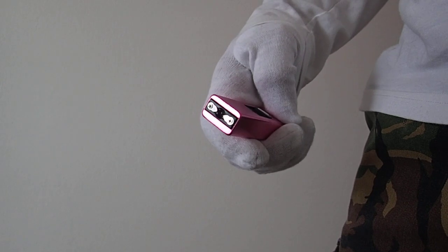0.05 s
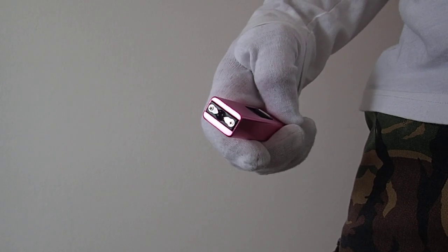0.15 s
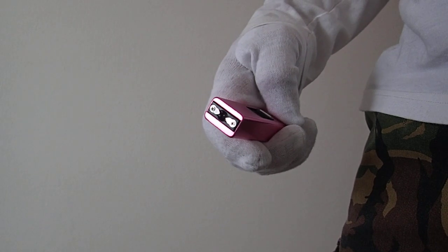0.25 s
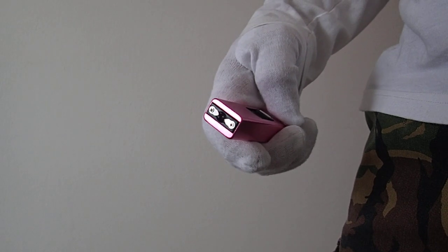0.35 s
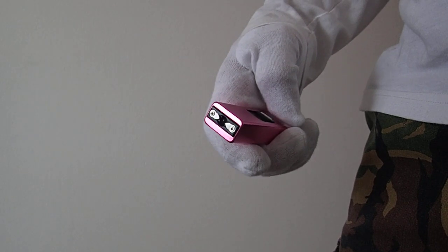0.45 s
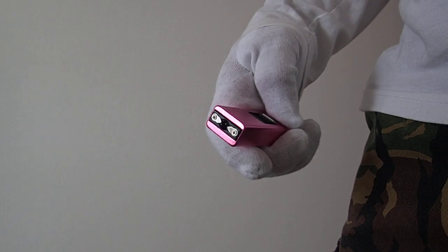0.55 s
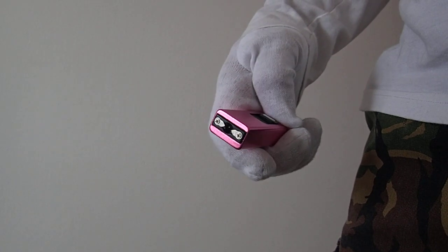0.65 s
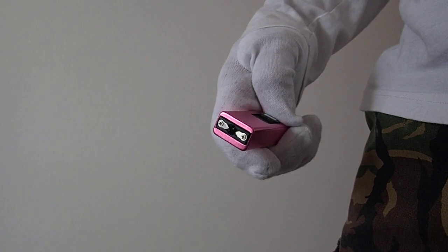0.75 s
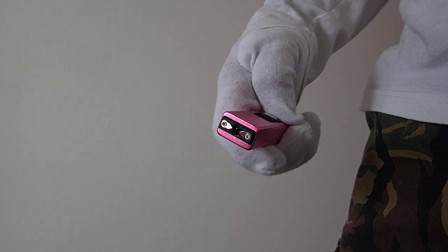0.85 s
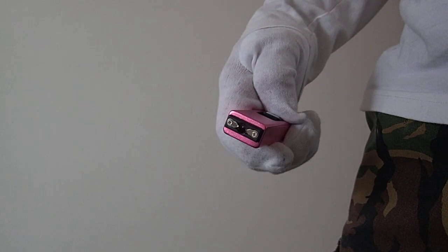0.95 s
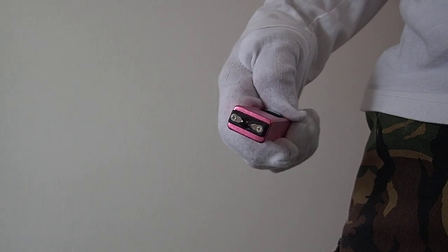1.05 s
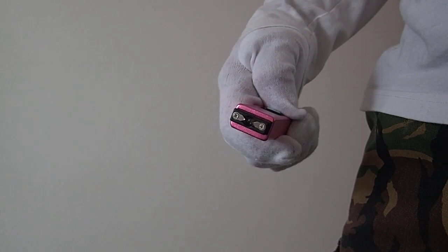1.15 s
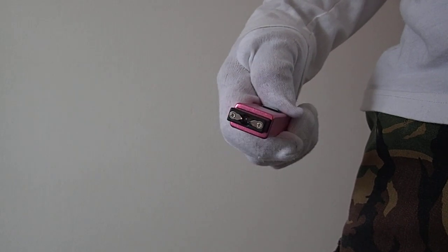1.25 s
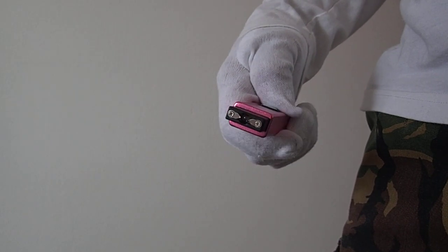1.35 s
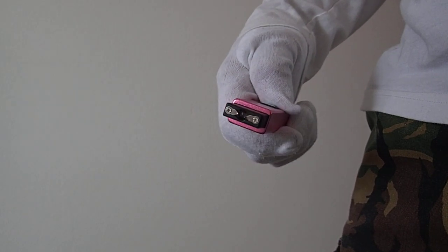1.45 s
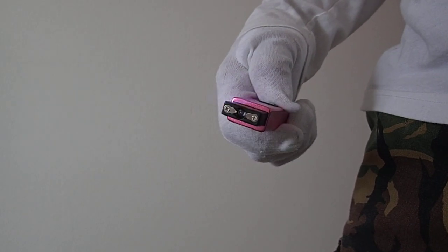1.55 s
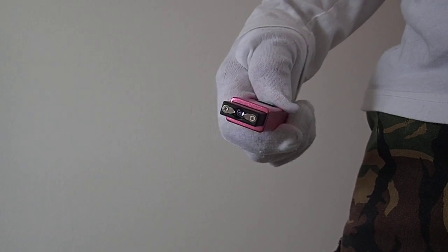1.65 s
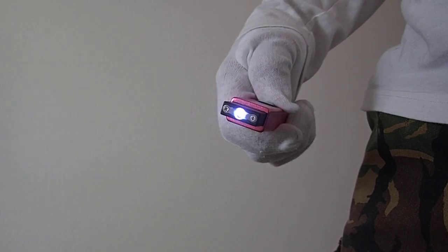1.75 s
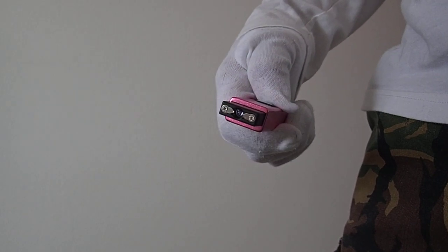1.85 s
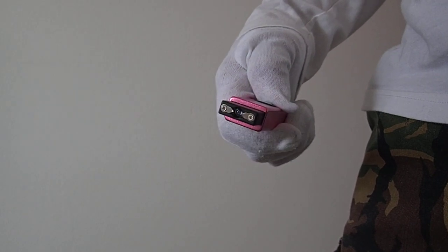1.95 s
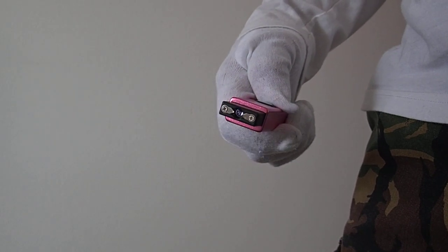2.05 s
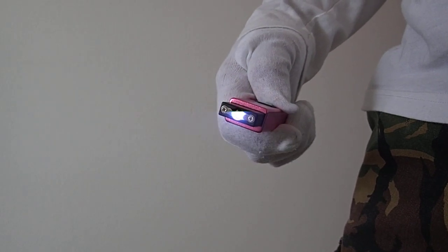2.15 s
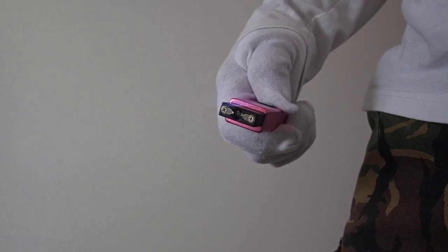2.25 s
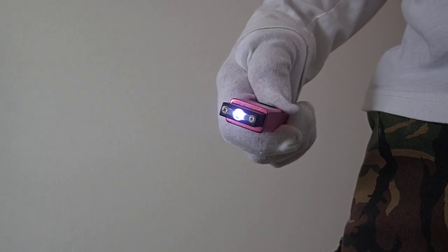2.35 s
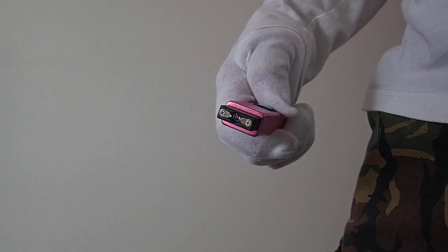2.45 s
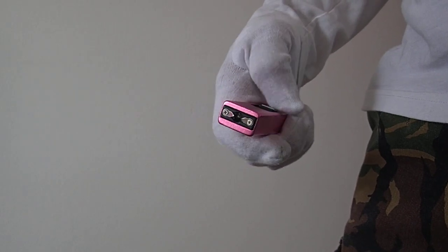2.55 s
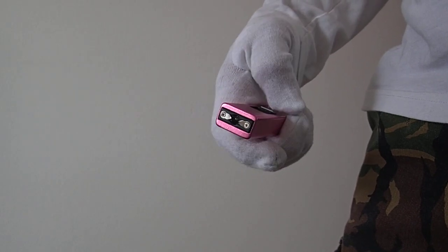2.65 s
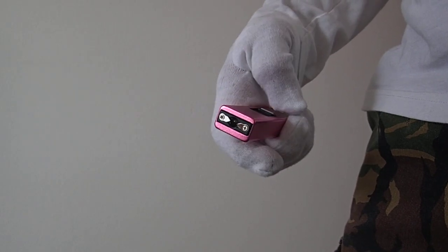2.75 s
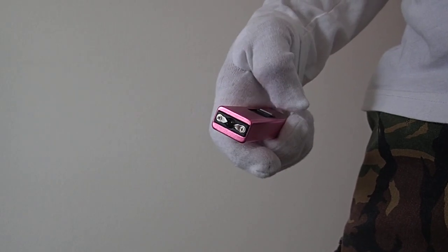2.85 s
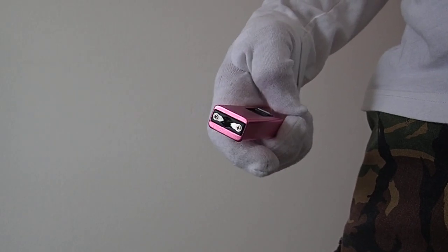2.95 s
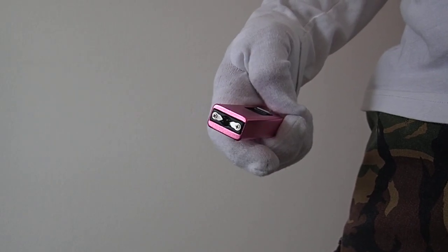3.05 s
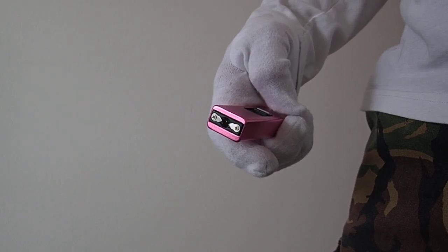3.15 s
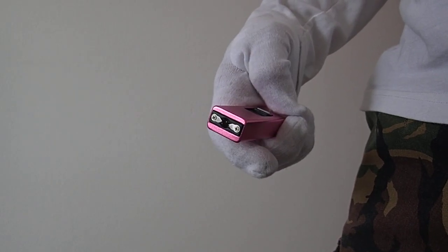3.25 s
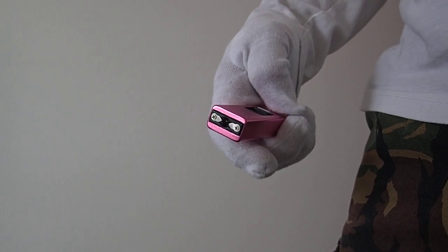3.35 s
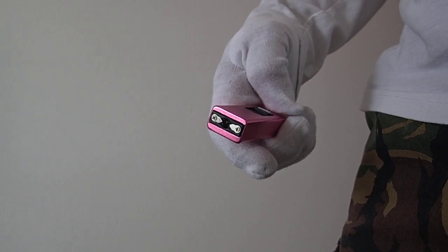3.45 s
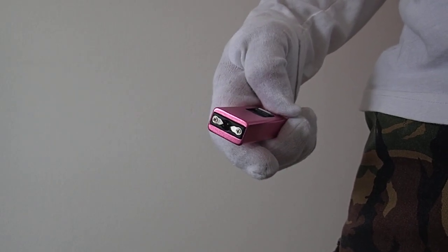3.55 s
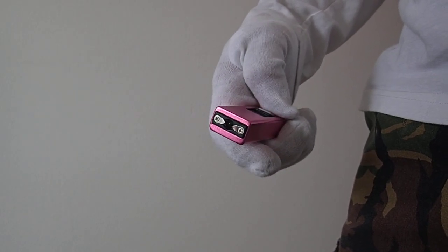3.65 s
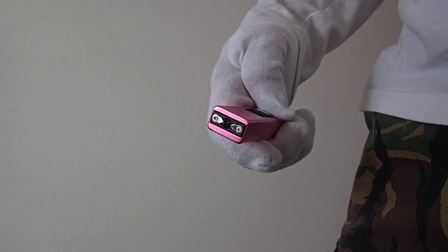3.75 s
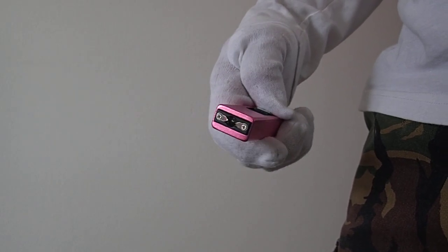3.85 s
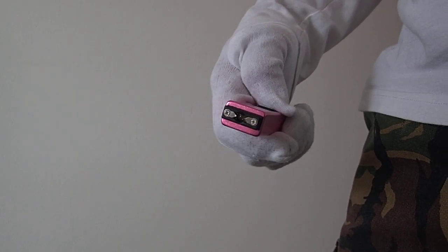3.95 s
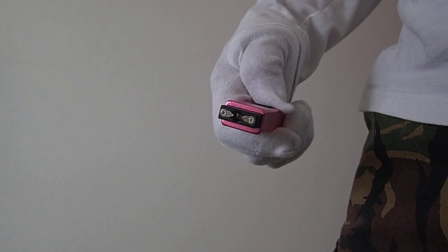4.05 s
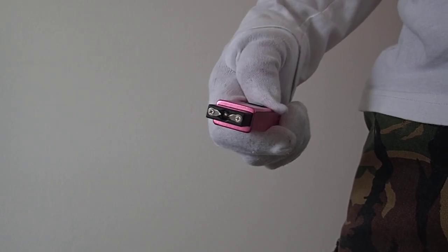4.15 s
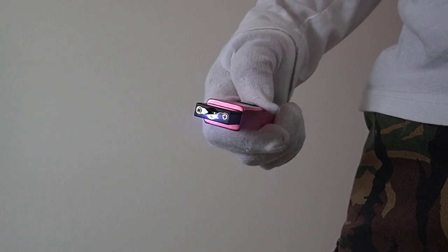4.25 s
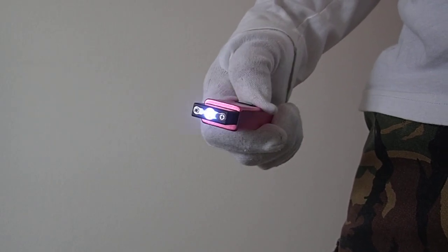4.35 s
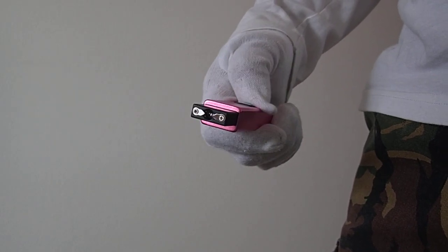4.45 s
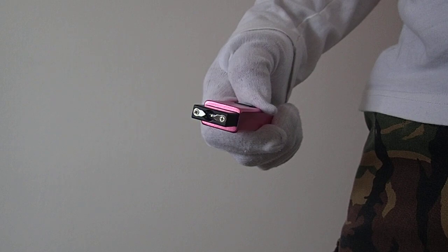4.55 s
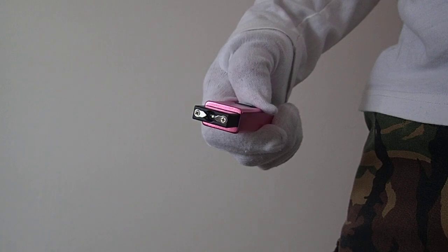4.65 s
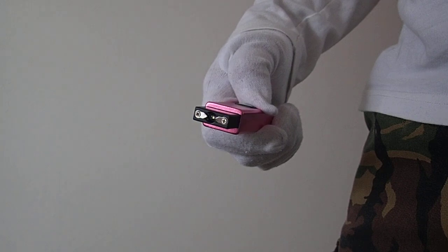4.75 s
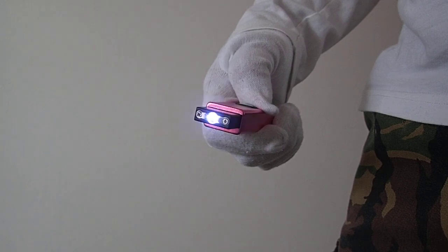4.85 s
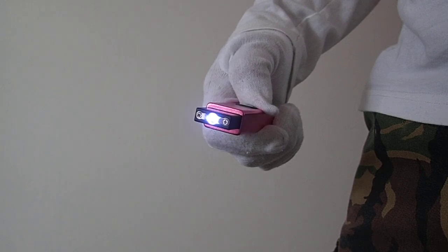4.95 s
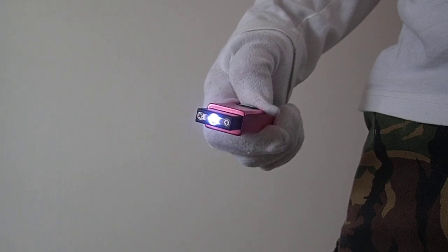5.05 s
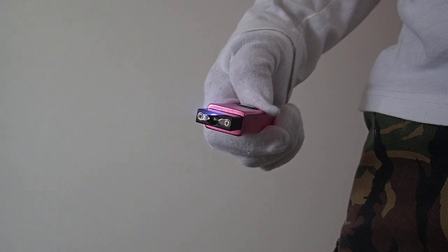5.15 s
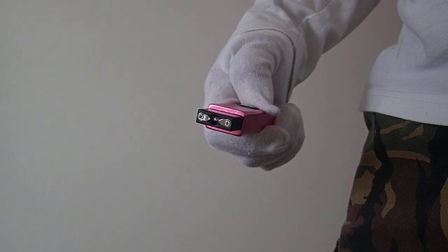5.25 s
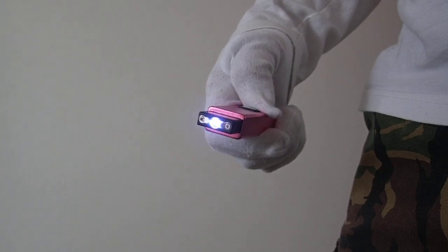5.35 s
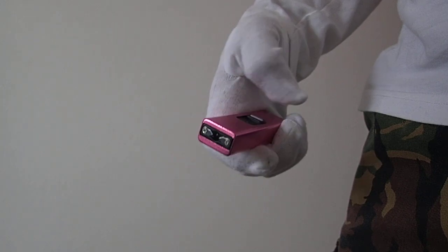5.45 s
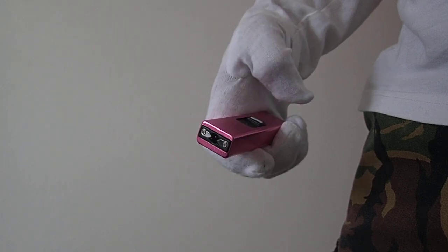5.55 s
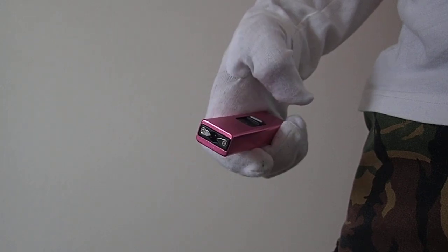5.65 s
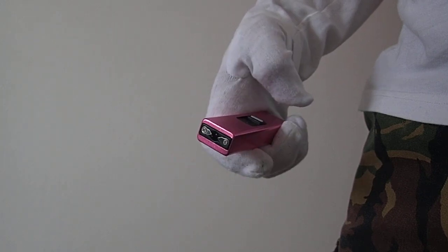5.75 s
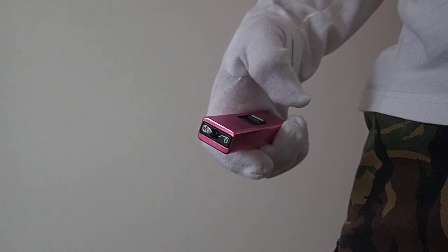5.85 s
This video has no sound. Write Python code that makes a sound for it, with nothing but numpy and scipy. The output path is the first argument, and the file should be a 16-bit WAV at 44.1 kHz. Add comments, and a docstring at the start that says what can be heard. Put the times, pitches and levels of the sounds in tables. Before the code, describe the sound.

A gloved hand triggers a small stun device twice. Each zap is a harsh buzzing train of separate bright snaps, about sixty per second, strongest at the onset and then sagging. Between zaps come a reverberant hissy tail, low room noise, tiny thumb clicks and a soft low rumble. The stereo microphone is close and overdriven, ringing brightly in a bare room.

```python
"""A small stun device, fired twice by a gloved hand in a bare, hard-walled room, heard on a stereo microphone.
Each spark is one sharp crack, with a low blip as it overloads the recorder; the microphone housing rings
with the crack, and the room answers with echoes and a hissy tail. Under it lie a steady hush, a brief muffled
rumble and faint switch ticks. Gain control ducks everything, then lets it creep back; the loudest peaks clip."""
import sys
import numpy as np
from scipy import signal
from scipy.fft import rfft, irfft, next_fast_len
from scipy.io import wavfile
from scipy.ndimage import minimum_filter1d

SR = 44100
rng = np.random.default_rng(int(sys.argv[2]) if len(sys.argv) > 2 else 0)


def put_to_file(sound):
    """Save the sound as 16-bit audio at rate SR, in the file named by the first command-line argument."""
    columns = np.atleast_2d(sound).T  # one column per channel
    safe = np.clip(columns, -1, 1)
    whole_steps = np.round(safe * 32767)
    wavfile.write(sys.argv[1], SR, whole_steps.astype(np.int16))


N = 261072

# moments at which the gap breaks down, before jitter: start_s [s]
SPARK_TIMES = [1.5423, 1.5579, 1.5762, 1.5905, 1.6094, 1.6246, 1.6426, 1.6564, 1.6699, 1.6869, 1.7038,
               1.7233, 1.7441, 1.765, 1.7781, 1.794, 1.806, 1.8249, 1.842, 1.8554, 1.874, 1.8931, 1.911,
               1.924, 1.943, 1.9622, 1.9752, 1.9928, 2.0076, 2.0242, 2.0341, 2.0576, 2.0701, 2.0896, 2.0994,
               2.1131, 2.1305, 2.1482, 2.1655, 2.186, 2.2068, 2.2254, 2.2375, 2.2584, 2.2772, 2.2933,
               2.3122, 2.3268, 2.3442, 2.355, 2.3705, 2.3821, 2.401, 2.4132, 2.4356, 2.4501, 2.4598, 2.4678,
               2.4926, 4.2182, 4.2343, 4.255, 4.2721, 4.2878, 4.3083, 4.3249, 4.335, 4.3424, 4.3611, 4.3809,
               4.3963, 4.4087, 4.428, 4.4383, 4.446, 4.4615, 4.4748, 4.4971, 4.516, 4.5254, 4.5439, 4.5584,
               4.5692, 4.5913, 4.6104, 4.6284, 4.637, 4.6582, 4.6765, 4.6993, 4.7138, 4.7237, 4.7353,
               4.7458, 4.7638, 4.7789, 4.7903, 4.8024, 4.824, 4.8395, 4.8617, 4.8818, 4.8921, 4.9086,
               4.9264, 4.9453, 4.965, 4.9865, 5.004, 5.02, 5.0327, 5.0466, 5.0672, 5.083, 5.092, 5.1027,
               5.1195, 5.1418, 5.162, 5.1807, 5.1951, 5.2106, 5.224, 5.2433, 5.2588, 5.2741, 5.297, 5.3149,
               5.333, 5.348, 5.3708, 5.3881, 5.3971, 5.4203]
# colour of the microphone housing, before each port's tuning: frequency_hz [Hz], level_db [dB per Hz]
HOUSING_SPECTRUM = [(590, -64), (1000, -33), (1430, -33.5), (1790, -25.5), (2650, -27), (3010, -18.5),
                    (4020, -25.5), (4850, -4.5), (5200, 4), (5700, -0.5), (7350, -7.5), (8070, -4),
                    (9280, -11.5), (12400, -10), (15100, -2.5), (17000, -7.5)]
# first echoes off table, floor and walls: delay_ms [ms], left_db [dB], right_db [dB]
EARLY_ECHOES = [(.8, -14, -13), (1.7, -17, -19), (2.45, -17, -16), (3.3, -19, -21), (4.46, -19, -20),
                (6.63, -22, -19), (9.8, -15, -16), (10.6, -18, -17), (15.1, -21, -24), (20.9, -20, -18)]
# reverberation, ahead of the housing: frequency_hz [Hz], t60_s [s], level_db [dB]
REVERB_TAIL = [(503, 0.79, -17), (2230, 0.72, -30), (5100, 0.81, -39.5), (7500, 0.58, -32.5),
               (11700, 0.44, -30.5), (15700, 0.24, -40.5)]
# colour of the steady room hush: frequency_hz [Hz], level_db [dB per Hz, relative]
HUSH_SPECTRUM = [(18, -44), (30, -14), (64, -10.5), (141, -6), (554, -5), (1630, -9.5), (1860, -15),
                 (2750, -20.5), (3140, -17), (3980, -25), (5170, -11.5), (8080, -9), (9970, -15),
                 (14800, -17), (16000, -19)]
# how alike the hush is left and right: frequency_hz [Hz], correlation [-1 to 1]
HUSH_LIKENESS = [(60, 0.35), (240, 0.25), (950, 0.23), (3770, 0.083), (15000, -0.036)]
# thumb on the switch, ahead of housing and room: start_s [s], level_db [dB]
SWITCH_TICKS = [(3.884, -56), (3.896, -54), (3.921, -52), (4.07, -55)]

# the whole hush, and its left side over its right
HUSH_DB, HUSH_LEFT_DB = -51, 2.5
# the longer the charge builds, the stronger the crack; cracks start each burst strong and sag
USUAL_WAIT_S, LONGEST_WAIT_S, SAG_S, JITTER_S = .016, .025, .42, .00004
CRACK_DB, CRACK_DB_PER_DOUBLED_WAIT, CRACK_FRESH_DB, CRACK_SPREAD_DB = 13.5, 2.4, 3.0, 1.09
# overload blips are strongest early in each burst, then weaken
BLIP_DB, BLIP_DB_PER_DOUBLED_WAIT, BLIP_FRESH_DB, BLIP_SPREAD_DB = -15.5, 1.5, 6.5, 2.5
BLIP_LEFT_DB = -3  # left over right
# factors on the housing frequencies: the right port resonates a little higher
LEFT_PORT_TUNING, RIGHT_PORT_TUNING = 0.96, 1.0157
# a muffled rumble somewhere in the building swells and fades
RUMBLE_START_S, RUMBLE_SWELL_S, RUMBLE_HOLD_S, RUMBLE_FADE_S = 3.86, .04, .16, .13
BOOM_DB, DRONE_HZ, DRONE_WIDTH_HZ, DRONE_DB = -58.5, 168.4, 5.9, -59
CUTOFF_HZ = 16300


def amp(db):
    """Amplitude factor of a level in dB."""
    return 10 ** (np.asarray(db) / 20)


def rms_one(x):
    """Scale a signal to an rms of one."""
    return x / np.sqrt(np.mean(x ** 2) + 1e-20)


def at_hz(points, hz, axis=1):
    """Read a table column at any frequency, interpolating along log frequency."""
    points = np.array(points)
    return np.interp(np.log(np.maximum(hz, 1)), np.log(points[:, 0]), points[:, axis])


def hush():
    """Steady coloured room noise, partly alike on both sides in the bass and hardly at all in the treble."""
    size = next_fast_len(N)
    hz = np.arange(size // 2 + 1) * SR / size
    mid, side = rfft(rng.standard_normal((2, size)))
    alike = at_hz(HUSH_LIKENESS, hz)
    pair = np.sqrt(1 + alike) * mid + np.sqrt(1 - alike) * side * [[1], [-1]]
    pair = pair * amp([[HUSH_LEFT_DB / 2], [-HUSH_LEFT_DB / 2]])
    coloured = irfft(pair * amp(at_hz(HUSH_SPECTRUM, hz)), size)[:, :N]
    return amp(HUSH_DB) * rms_one(coloured)


def strength_db(start_s, usual_db, per_wait_db, fresh_db):
    """Level of each crack or blip from the wait before its spark and the age of the burst."""
    wait = np.diff(start_s, prepend=0)
    # a very long wait marks a new burst
    burst_start = np.maximum.accumulate(np.where(wait > 10 * LONGEST_WAIT_S, start_s, 0))
    age = start_s - burst_start
    charge_db = per_wait_db * np.log2(np.minimum(wait, LONGEST_WAIT_S) / USUAL_WAIT_S)
    return usual_db + charge_db + fresh_db * np.exp(-(age / SAG_S) ** 3)


def sparks(variation=0.09):
    """Each crack is a sharp spike, nearly alike, with a slight random variation over five samples."""
    start_s = np.array(SPARK_TIMES)
    draws = rng.standard_normal((len(start_s), 10))
    at = np.round((start_s + JITTER_S * draws[:, 7]) * SR).astype(int)
    crack_db = strength_db(start_s, CRACK_DB, CRACK_DB_PER_DOUBLED_WAIT, CRACK_FRESH_DB)
    crack_db = crack_db + CRACK_SPREAD_DB * draws[:, 0]
    cracks = np.zeros(N)
    for k in range(6):
        shape = 1 if k == 0 else variation * draws[:, k] / np.sqrt(k)
        cracks[at + k] = -amp(crack_db) * shape
    blip_db = strength_db(start_s, BLIP_DB, BLIP_DB_PER_DOUBLED_WAIT, BLIP_FRESH_DB)
    blip_db = blip_db + BLIP_SPREAD_DB * draws[:, 6]
    return cracks, overload_blips(at, blip_db, draws[:, 8:].T)


def overload_blips(at, level_db, side_draws, blip_hz=700, decay_s=0.00033, side_spread_db=1.5):
    """Low blip as a crack overloads the recorder: a brief damped cosine, bass removed, no housing or room."""
    balance_db = [[BLIP_LEFT_DB / 2], [-BLIP_LEFT_DB / 2]]
    impulses = np.zeros((2, N))
    impulses[:, at] = -amp(level_db + side_spread_db * side_draws + balance_db)
    t = np.arange(400) / SR
    blip = np.cos(2 * np.pi * blip_hz * t) * np.exp(-t / decay_s)
    blip = signal.sosfilt(signal.butter(2, 300, "high", fs=SR, output="sos"), blip)
    return signal.lfilter(blip, 1, impulses)


def housing_response(tuning, size=2048):
    """Minimum-phase ring of the microphone housing: fold the cepstrum of its spectrum, peak at one."""
    hz = np.arange(size // 2 + 1) * SR / size
    log_gain = np.log(amp(at_hz(HOUSING_SPECTRUM, hz / tuning)))
    cepstrum = irfft(log_gain, size)
    cepstrum[1:size // 2] *= 2
    cepstrum[size // 2 + 1:] = 0
    response = irfft(np.exp(rfft(cepstrum)), size)[:size // 2]
    return response / np.abs(response).max()


def bands(white):
    """Half-octave slices of noise with their centres; neighbours come from unrelated draws."""
    edges = 22 * 2 ** np.arange(0, 9.8, .5)
    for k, (low, high) in enumerate(zip(edges, edges[1:])):
        sos = signal.butter(2, [low, high], "band", fs=SR, output="sos")
        yield np.sqrt(low * high), signal.sosfilt(sos, white[k % 2])


def room_response(length_s=1.1, build_up_s=0.011):
    """Direct sound, a few smeared echoes, and noise that builds up, then decays at a rate set per band."""
    t = np.arange(int(length_s * SR)) / SR
    out = np.zeros((2, len(t)))
    for hz, band in bands(rng.standard_normal((2, 2, len(t)))):
        decay_db = 60 * t / at_hz(REVERB_TAIL, hz)
        out += band * amp(at_hz(REVERB_TAIL, hz, axis=2) - decay_db)
    out *= 1 - np.exp(-t / build_up_s)
    # each echo is a spike with a weaker noisy smear of 30 samples
    smear = rng.standard_normal((len(EARLY_ECHOES), 2, 30)) * np.exp(-np.arange(30) / 6.0) * 0.3
    smear[:, :, 0] = 1
    for (delay_ms, *sides_db), echo in zip(EARLY_ECHOES, smear):
        at = round(delay_ms * SR / 1000)
        out[:, at:at + 30] += echo * amp(sides_db)[:, None]
    out[:, 0] += 1  # direct sound
    return out


def in_room(dry_mono):
    """A sound spreads through the room and rings the two microphone ports."""
    ports = np.array([housing_response(LEFT_PORT_TUNING), housing_response(RIGHT_PORT_TUNING)])
    heard = signal.fftconvolve(room_response(), ports, axes=1)
    return signal.fftconvolve(dry_mono[None], heard, axes=1)[:, :N]


def rumble(boom_hz=(140, 420)):
    """A broad low boom of filtered noise with a narrow drone in it, the same on both sides."""
    drone_hz = DRONE_HZ - DRONE_WIDTH_HZ / 2, DRONE_HZ + DRONE_WIDTH_HZ / 2
    corners_s = np.cumsum([RUMBLE_START_S, RUMBLE_SWELL_S, RUMBLE_HOLD_S, RUMBLE_FADE_S])
    out = np.zeros(N)
    for band_hz, level_db in ((boom_hz, BOOM_DB), (drone_hz, DRONE_DB)):
        sos = signal.butter(2, band_hz, "band", fs=SR, output="sos")
        noise = signal.sosfilt(sos, rng.standard_normal(N))
        out += rms_one(noise) * amp(level_db)
    return out * np.interp(np.arange(N) / SR, corners_s, [0, 1, 1, 0])


def ticks(decay_s=0.0047):
    """Each tick of the thumb on the switch is a short decaying scratch of noise."""
    out, t = np.zeros(N), np.arange(600) / SR
    for start_s, level_db in SWITCH_TICKS:
        scratch = rng.standard_normal(600) * np.exp(-t / decay_s)
        out[round(start_s * SR):][:600] += amp(level_db) * scratch
    return out


def scene():
    """Hush throughout, cracks and ticks in the room, blips and rumble added straight."""
    background = hush()
    cracks, blips = sparks()
    return background + in_room(cracks + ticks()) + blips + rumble()


def gain_control(x, threshold_db=3.0, hold_s=0.069, release_db_s=61.0, fast_s=0.0088, slow_s=0.6,
                 fast_share=0.73):
    """Peaks over the threshold turn the gain down, partly fast, partly slowly; it holds, then climbs back."""
    over_db = np.maximum(20 * np.log10(np.abs(x).max(0) + 1e-9) - threshold_db, 0)
    # hold the largest excess of the recent past, then let it fall at a steady rate
    span = 2 * round(hold_s * SR / 2) + 1
    held = -minimum_filter1d(-over_db, span, origin=span // 2)
    ramp = release_db_s * np.arange(N) / SR
    wanted_db = np.maximum.accumulate(held + ramp) - ramp
    poles = np.exp(-1 / (np.array([fast_s, slow_s]) * SR))
    fast, slow = (signal.lfilter([1 - r], [1, -r], wanted_db) for r in poles)
    mixed = fast_share * fast + (1 - fast_share) * slow
    return x * amp(-np.minimum(mixed, fast))


def record(dry):
    """Gain control, hard overload, then the top cut off by a steep low-pass run both ways."""
    loud = np.clip(gain_control(dry), -.96, .96)
    top_cut = signal.cheby2(14, 30, CUTOFF_HZ, fs=SR, output="sos")
    return np.clip(signal.sosfiltfilt(top_cut, loud), -1, 1)


dry = scene()
out = record(dry)
put_to_file(out)
```